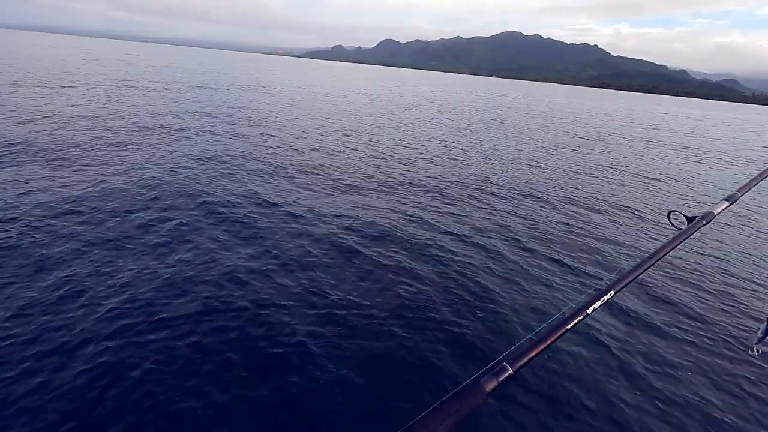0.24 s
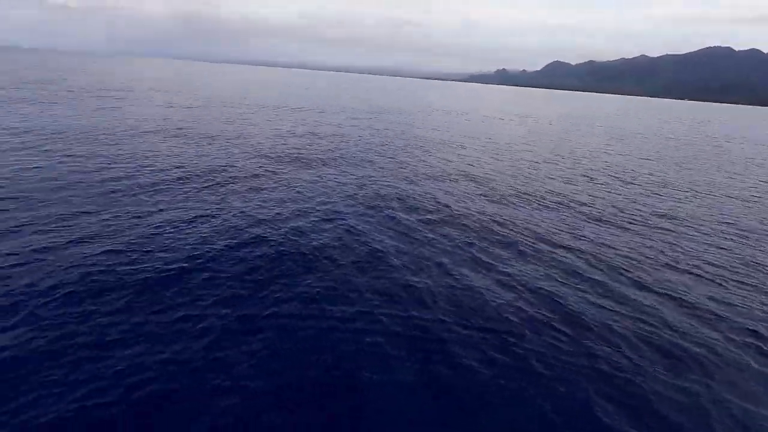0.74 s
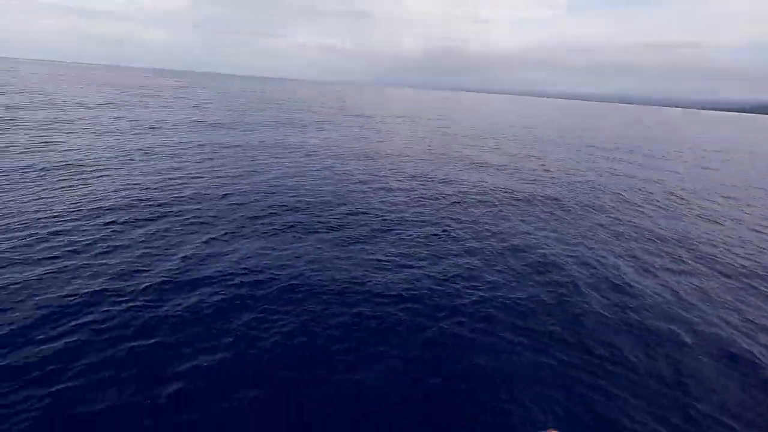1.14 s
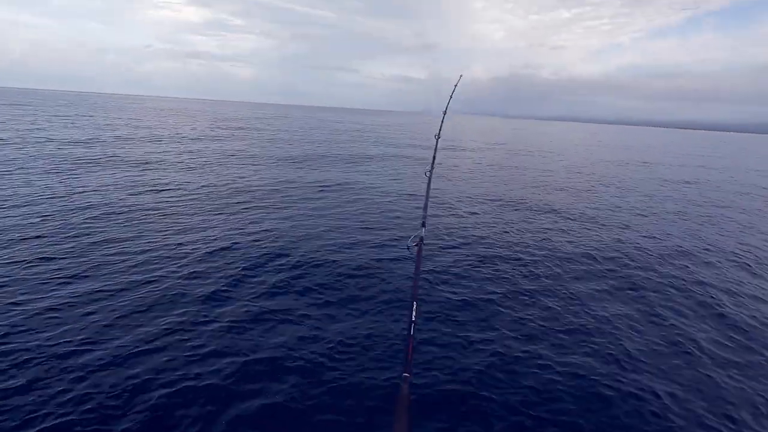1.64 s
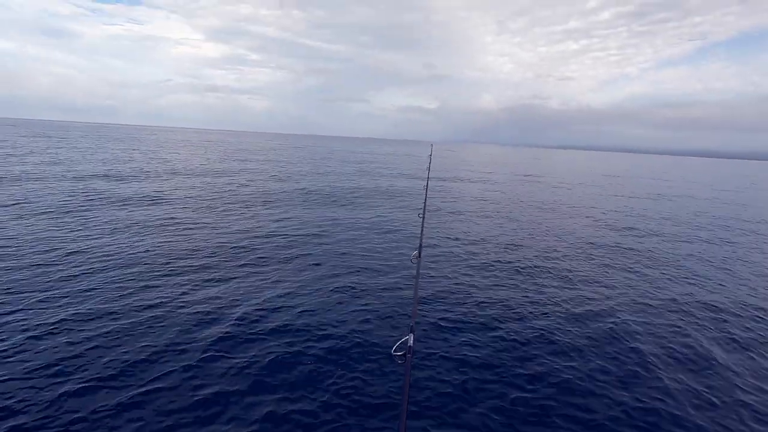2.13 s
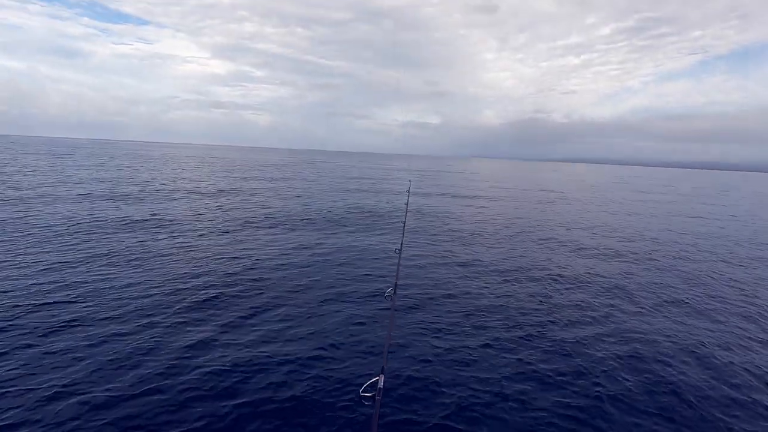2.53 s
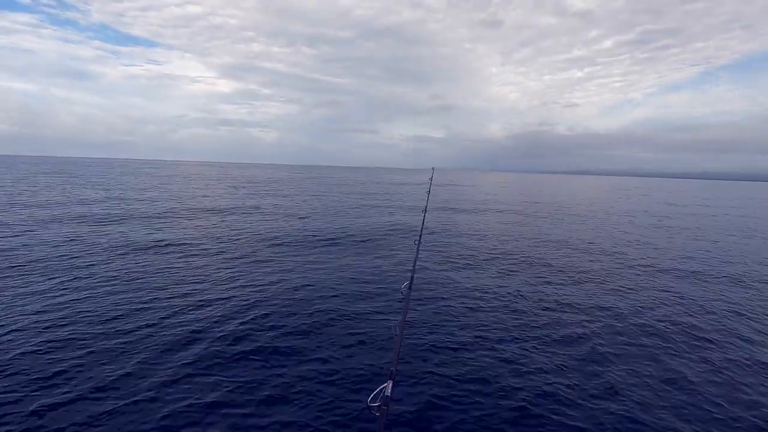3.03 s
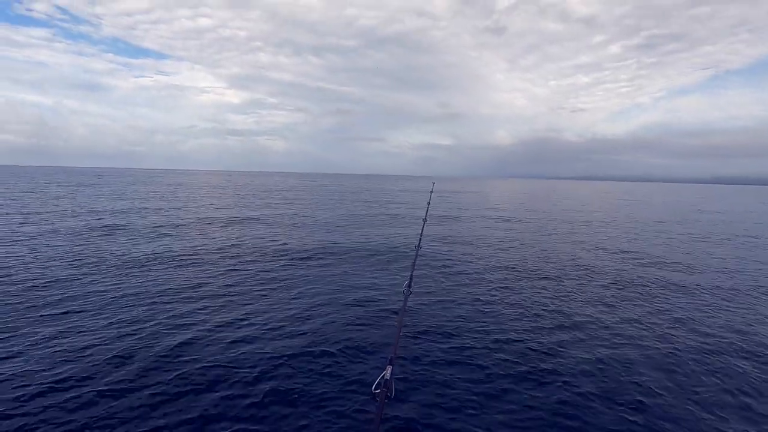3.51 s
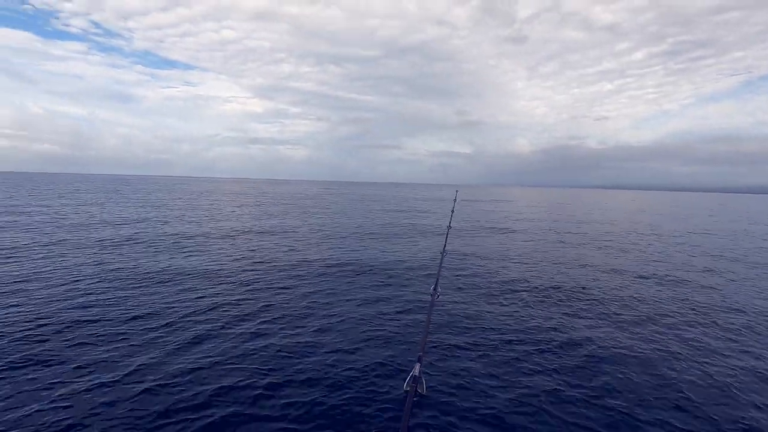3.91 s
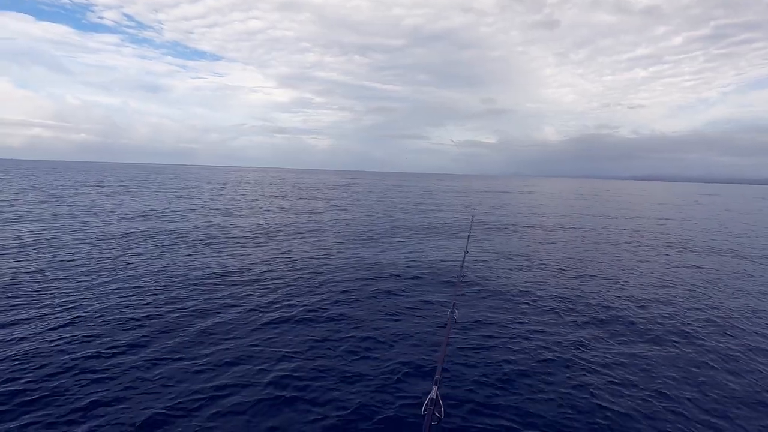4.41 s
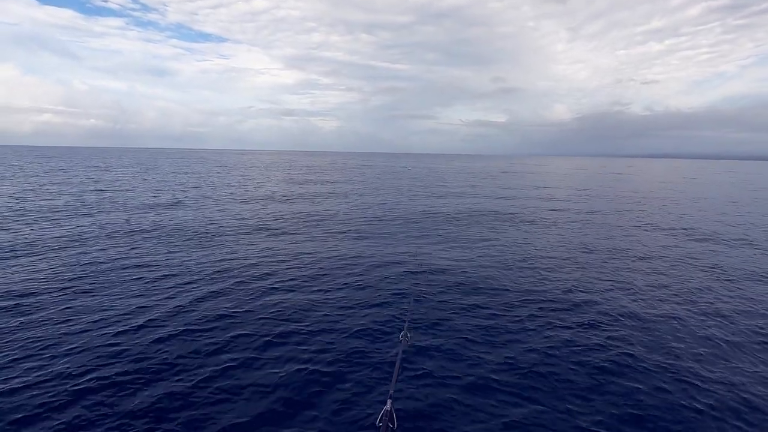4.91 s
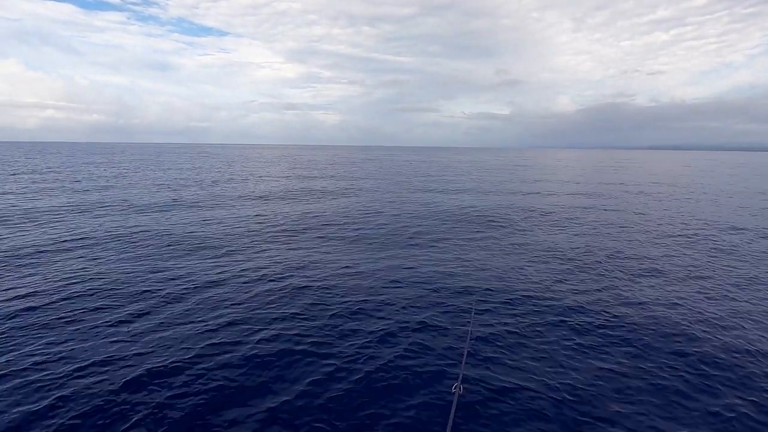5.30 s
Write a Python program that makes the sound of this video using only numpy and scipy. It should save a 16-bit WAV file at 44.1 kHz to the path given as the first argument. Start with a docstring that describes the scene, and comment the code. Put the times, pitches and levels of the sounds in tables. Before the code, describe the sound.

A fishing rod is cast close to the microphone, with a rising whoosh and a sharp crack. Line spins off the spool in a fast, fluttering hiss, ringing against the rod guides and gradually dropping in pitch and level. A loud clack of the reel's bail cuts it off, and slack line slides softly. Throughout, water laps and gurgles against a small boat, with a few hollow knocks and wind rumbling on the microphone.

```python
"""Fishing line on a long cast from a small boat: it whirls off the spool and rubs the guides, a high
hiss that sinks as the lure slows, while each coil whips the rod and rings a guide. Before the run a
sleeve rustles, the rod swishes and the line cracks against it; the bail ends the run with a sharp clack.
Wavelets slap and wash the hull, the boat knocks, wind buffets the microphone."""
import sys
import numpy as np
from scipy import signal
from scipy.fft import rfft, irfft, next_fast_len
from scipy.io import wavfile
from scipy.ndimage import uniform_filter1d, map_coordinates

SR = 44100
rng = np.random.default_rng(int(sys.argv[2]) if len(sys.argv) > 2 else 0)


def transcribe(u):
    """Save the signal u as a 16-bit wav file named by the first command-line argument.

    u: samples, shape (n,) or (channels, n), limited to [-1, 1]; the rate is SR.
    q: integer samples, one column per channel.
    """
    v = np.clip(np.atleast_2d(u).T, -1, 1)
    q = np.round(v * 32767).astype(np.int16)
    wavfile.write(sys.argv[1], SR, q)


N = 244755
TIME_S = np.arange(N) / SR
RUN_S, STOP_S = 1.681, 4.608  # line runs freely

# coils leaving the spool: t/s, rate/Hz
COIL_RATE = [(1.65, 165), (1.8, 150.6), (2.0, 134), (2.2, 121.5), (2.4, 109.6), (3.0, 83.7), (3.6, 68),
             (4.15, 56), (4.6, 55.6)]
# hiss shape: f/centre, level/dB
HISS_SHAPE = [(.1, -21), (.3, -8), (.55, -4), (.75, -0.5), (.98, 5), (1.17, 2.6), (1.4, -7.5), (1.7, -17.5),
              (2.2, -26), (2.8, -36)]
# hiss balance: f/Hz, L-R/dB
HISS_PAN = [(1000, 10), (3400, 4), (5000, -6), (7000, -6), (12000, -6)]
# line loops brushing a guide: t/s, level/dB, half-width/s
GUIDE_BRUSHES = [(1.697, -34, 0.017), (1.8, -37.5, 0.034), (1.912, -37, 0.041), (2.041, -40.5, 0.025),
                 (2.19, -45, 0.032), (2.335, -43, 0.012), (2.376, -42.5, 0.02), (2.517, -51, 0.043),
                 (2.583, -53.5, 0.029), (2.705, -47.5, 0.037), (2.921, -49, 0.024), (3.381, -52.5, 0.0068),
                 (3.526, -58, 0.0046), (3.584, -49.5, 0.0043), (3.728, -51, 0.0059), (3.945, -48.5, 0.029),
                 (4.131, -45, 0.0042), (4.248, -51.5, .018), (4.318, -49.5, 0.016), (4.393, -45.5, 0.033),
                 (4.538, -48, 0.046)]
# wide loops flapping past: t/s, level/dB
LOOP_FLAPS = [(1.716, -30), (1.859, -30.5), (1.899, -34.5), (2.052, -45), (2.16, -37), (2.28, -41.5)]
# blows: t/s, level/dB, rise/s per 9 dB, t60/s, tilt/(dB/octave)
ROD_BLOWS = [(1.578, -22.5, 0.0033, 0.027, 6), (1.5873, -12, 0.00086, 0.0094, 3.5),
             (1.5994, -14.5, 0.0052, 0.05, 0.5), (1.614, -32.5, .003, 0.15, 5.5),
             (3.885, -37, 0.0039, 0.031, 7), (3.906, -36, .001, 0.019, 0.5),
             (3.985, -42, 0.00073, 0.017, -6.5), (4.093, -37, 0.00089, .015, 3),
             (4.394, -34, .001, .012, 2.5), (4.535, -40, 0.00088, 0.014, -1)]
BAIL_BLOWS = [(4.6107, -23.5, 0.00023, 0.02, -0.5), (4.619, -21, .0005, .016, 2),
              (4.63, -4, 0.0015, 0.0072, 0), (4.635, -22.5, .0023, .17, -1.5),
              (4.659, -25, 0.0016, 0.028, -3), (4.6865, -18, 0.0013, 0.027, 0),
              (4.704, -31, 0.0023, 0.044, -8)]
# struck tones: t/s, level/dB, f/Hz, t60/s
METAL_RINGS = [(1.5727, -20.5, 3480, 0.046), (4.63, -36, 1180, .35), (4.63, -40, 507, 0.29),
               (4.704, -54, 5570, 0.35)]
BOAT_KNOCKS = [(1.836, -28.5, 500, 0.098), (1.891, -21.5, 432, 0.046), (2.1121, -18.5, 805, 0.009),
               (2.163, -21.5, 116.5, 0.11), (4.694, -32, 361, 0.15)]
# line and hand scuffing the rod: t/s, level/dB, t60/s
ROD_SCUFFS = [(0.149, -67, 0.084), (.606, -60, 0.07), (.624, -65.5, 0.1), (1.183, -62, 0.14),
              (1.365, -68, 0.1), (4.774, -55.5, 0.35), (4.825, -59, 0.07), (4.961, -52.5, 0.014)]
# light tackle knocks: t/s, level/dB, f/Hz
TACKLE_TICKS = [(.204, -65, 4130), (.51, -69, 4500), (1.865, -29.5, 1220), (4.767, -44, 2110),
                (4.817, -52, 3740), (4.849, -47, 4350), (4.997, -47.5, 4070), (4.999, -45, 1650),
                (5.072, -41.5, 3990), (5.077, -44.5, 2200), (5.075, -39, 1004)]
# wavelets: t/s, level/dB, bubble f/Hz, spray trim/dB, spray f/Hz, rise/s, air pocket trim/dB
HULL_SLAPS = [(0.222, -50.5, 1246, -12, 1800, .0005, 4), (.262, -47.5, 665, -30, 1800, .005, 4),
              (.342, -39.5, 1250, -12, 2600, 0.0044, -6), (.356, -31, 824, -3, 1820, .001, -20),
              (.367, -33, 602, 3.5, 1770, 0.0056, -1.5), (.402, -34, 741, -1, 2200, 0.006, -5),
              (.437, -35.5, 1000, -1, 2080, .0004, -21), (.702, -43.5, 860, -22, 2000, 0.0008, -4),
              (1.105, -55.5, 1280, -9, 3500, 0.0032, 6), (2.113, -35.5, 1230, -6, 1980, .0006, 2),
              (2.162, -36.5, 232.8, -30, 2000, .003, -0.5), (2.609, -39, 400, -17, 1800, 0.0021, -4),
              (3.086, -43.5, 1170, -30.5, 2000, 0.0029, 4), (3.244, -31, 1190, -2.5, 2380, 0.0018, 0.5),
              (3.278, -34, 666, -4, 2010, 0.0035, 1), (3.315, -38, 376, -25, 2000, 0.0047, -14),
              (3.35, -31, 945, -4, 3540, 0.0015, -16), (3.392, -39, 590, 6.5, 3000, .003, -15),
              (3.49, -47.5, 1280, -22, 2000, .002, 6), (3.497, -45.5, 605, -19, 2000, 0.0027, 5),
              (4.695, -35, 368, -6, 1800, 0.0027, -7), (4.763, -33.5, 1027, 5.5, 2080, 0.0095, -4),
              (4.815, -36, 1067, -6, 3000, 0.0065, -12), (5.37, -37.5, 870, -2.5, 2200, 0.0086, -6),
              (5.418, -49.5, 1400, 7.5, 2400, 0.0032, -3), (5.444, -36.5, 1027, -25, 2500, .002, -2)]
# swells along the hull: t/s, level/dB, fall/(dB/s) (sign ignored)
HULL_SURGES = [(0.268, -45.5, 36), (0.414, -42, 73), (.73, -53.5, 42), (2.39, -47.5, 41), (2.61, -50.5, -4),
               (2.999, -59, 55.5), (3.286, -33, 77), (3.376, -34, 109), (3.99, -50.5, 52), (4.714, -38, 42),
               (5.39, -45, 46)]
# wind strength: t/s, level/dB
WIND_LEVEL = [(0.0, -60), (0.36, -59), (1.17, -62.5), (1.27, -42.5), (1.39, -44), (1.58, -42.5),
              (1.79, -32.5), (1.97, -38.5), (2.06, -45.5), (2.32, -36.5), (2.57, -40.5), (2.66, -35.5),
              (2.92, -38.5), (3.15, -30), (3.43, -40.5), (4.28, -47), (4.54, -39.5), (4.62, -44),
              (4.93, -34), (5.12, -38), (5.33, -35.5), (5.55, -55)]
# eddies on the microphone: t/s, flutter/dB, buffet/dB
EDDIES = [(1.6, -38, -48), (1.9, -32, -40), (2.17, -43, -42), (2.621, -52, -28.5), (2.765, -36.5, -28.5),
          (3.07, -36, -33), (3.15, -31, -34), (3.3, -38, -45.5), (4.328, -58, -34), (4.73, -43, -51),
          (4.858, -33.5, -40), (5.03, -42, -47), (5.24, -40.5, -34)]

# resonances: f/Hz, width/Hz, level/dB
RATTLE_MODES = [(1280, 460, -0.5), (2200, 850, -1.5), (3000, 5300, -6.5), (4650, 710, -2.5)]
SPOOL_MODES = [(10690, 70, 0), (12030, 120, -7), (13330, 100, -10)]
GUIDE_MODES = [(4800, 210, 7), (8500, 270, -1), (10300, 300, -31)]
ROD_MODES = [(342, 87, -8), (506, 35, -3.5), (700, 190, -6), (1153, 74, 9), (1360, 290, 6),
             (1920, 730, 5.5), (2970, 630, 5.5), (3630, 350, -1), (4390, 190, 1.5), (5000, 210, -4.5),
             (5720, 440, -5.5), (7070, 1140, -12), (8800, 1100, -18), (12360, 2200, -19.5)]
BAIL_MODES = [(1170, 150, -5), (1410, 180, -6), (1975, 260, -1.5), (2760, 260, -9.5), (3250, 170, -4.5),
              (4440, 235, 1), (4910, 260, 0), (5500, 240, -14), (5780, 340, -8.5), (6500, 320, -11),
              (7050, 320, -16), (8900, 550, -17), (10500, 1200, -22), (12400, 1300, -25.5)]
HULL_MODES = [(590, 86, 1.5), (1230, 110, -0.5)]
# noise spectra: f/Hz, density/dB
SLIDE_SPECTRUM = [(700, -14.5), (1250, 6), (2200, 3), (3900, -2.5), (5400, -3), (7000, -9), (9500, -17),
                  (14000, -31.5)]
SWISH_SPECTRUM = [(60, -15), (170, 1), (500, -4.5), (1300, -9.5), (2500, -13.5), (4500, -21.5), (8000, -34),
                  (15000, -55)]
SLEEVE_SPECTRUM = [(400, -4), (900, 3), (1550, 3), (1800, -2), (2100, -2.5), (2600, -12), (3000, -28),
                   (6000, -41)]
WASH_SPECTRUM = [(80, -9.5), (135, 8.5), (200, 6), (420, -3), (750, -14.5), (1300, -10.5), (2200, -25.5),
                 (5000, -46.5), (14000, -51.5)]
SEA_SPECTRUM = [(60, -21.5), (125, 4), (200, 12.5), (450, -0.5), (900, -13), (1300, -8.5), (1900, -26),
                (3000, -30), (8000, -36), (15000, -68)]
BUFFET_SPECTRUM = [(8, -12.5), (25, 2.5), (55, 1), (95, -4), (150, -21.5), (400, -63.5), (1000, -95.5)]
FLUTTER_SPECTRUM = [(60, -12), (120, 0.5), (180, 0.5), (280, -17.5), (500, -26), (1500, -70)]
# left-right likeness: f/Hz, coherence
SCENE_COHERENCE = [(100, 1), (300, 0.9), (4000, 0.75), (8000, 0.81), (13000, 0.22)]
WIND_COHERENCE = [(30, 0.089), (70, 0.054), (130, 0.63), (300, 0.22)]
# microphone treble: f/Hz, gain/dB
MIC_TREBLE = [(11000, 0), (13000, -3), (14500, -7), (15800, -4)]
# balance of blows: f/Hz, L-R/dB
BLOW_PAN = [(1500, 1.5), (3000, 4.0), (5000, -4.5), (10000, -7.5)]


def line_hiss(turns):
    """Line rubs the guides: a ragged band, pulsing per coil, sinking and fading with speed."""
    hz, frame_s, spectra = signal.stft(noise(), SR, nperseg=512)
    centre_hz = np.maximum(82 * np.interp(frame_s, *np.transpose(COIL_RATE)), 5950)
    centre_hz *= 1 + .025 * np.interp(frame_s, TIME_S, wobble(50))
    patches = uniform_filter1d(rng.standard_normal(spectra.shape[1:]), size=6, axis=0)
    patches_db = 1.8 * unit(uniform_filter1d(patches, size=4, axis=1))
    gain = amp(along(HISS_SHAPE, hz[:, None] / centre_hz) + patches_db)
    gain /= np.sqrt(np.mean(gain ** 2, axis=0))
    hiss = signal.istft(spectra * gain, SR, nperseg=512)[1][:, :N]
    pulsing = unit(amp(1.6 * np.cos(2 * np.pi * turns) + 2 * wobble(300) + .6 * wobble(45)))
    hiss = filtered(hiss * pulsing, lambda f: pan(along(HISS_PAN, f)))
    speed_db = 6.5 * np.log2(curve(COIL_RATE) / 100)
    dip_db = -3 * bump(3.1, width_s=.043)
    return hiss * amp(-45.5 + speed_db + dip_db) * running()


def line_sizzle(turns):
    """Fast line sizzles in the guides at a fixed pitch, then fades."""
    force = amp(1.2 * np.cos(2 * np.pi * turns) + 2.5 * wobble(300))
    band = unit(rubbed(force, hz=12600, width_hz=2100))
    return band * amp(-52) * swell(RUN_S, 422, 27, hold_to_s=2.13) * running() * pan(-11)


def line_rattle(turns):
    """Coils whip the rod and ring a guide: hard after release, again as the line goes loose."""
    wild = amp(-44.5) * swell(RUN_S, 0, 13.5)
    loose = amp(-50.5) * swell(3.984, 33, 0)
    rattle = np.hypot(wild, loose)
    first_lash = amp(-39.5) * swell(1.73, 189, 125)
    uneven_turns = turns + .05 * wobble(60)
    whip = coil_blows(uneven_turns, scatter_db=1.2) * amp(.99 * wobble(300))
    rod = rubbed_body(whip, RATTLE_MODES) * pan(1.4)
    return rod * np.hypot(rattle, first_lash) * running() + guide_ring(uneven_turns, rattle)


def guide_ring(turns, rattle, hz=3381):
    """One guide mode, struck and scraped by coils and brushing loops."""
    brushes = sum(amp(db) * bump(s, width_s) for s, db, width_s in GUIDE_BRUSHES)
    force = np.hypot(rattle * amp(-2), brushes) * coil_blows(turns, scatter_db=2.2) * running()
    struck = unit(force * np.sin(2 * np.pi * hz * TIME_S + 1.3 * wobble(600)))
    scraped = unit(rubbed(force, hz, width_hz=270))
    return unit(struck + scraped) * np.sqrt(np.mean(force ** 2))


def spool_whistle():
    """Thin, flickering spool modes grow late in the run."""
    modes = rubbed_body(1, SPOOL_MODES)
    return modes * amp(-71.5 + 3.5 * wobble(25)) * swell(4, 14, 0) * running()


def line_whirl(turns):
    """The spinning loop hums at the coil rate while fast; the first loop is loudest."""
    hum = np.sqrt(2) * (np.sin(2 * np.pi * turns) + amp(-17) * np.sin(4 * np.pi * turns))
    first_loop = amp(-26) * swell(1.823, 174, 392)
    steady = amp(-42.5) * swell(1.823, 210, 124, hold_to_s=2.386)
    return hum * np.hypot(first_loop, steady) * amp(1.2 * wobble(8))


def slack_line(full_s=5.163, end_s=5.32):
    """Slack line slides over the guides and briefly rings them."""
    ring = unit(filtered(noise(), lambda f: resonances(GUIDE_MODES, f)))
    ring *= amp(-67) * swell(full_s, 302, 243, hold_to_s=end_s)
    slide = rush(SLIDE_SPECTRUM) * amp(-60) * swell(full_s, 75, 16, hold_to_s=end_s)
    crackle = unit(amp(4 * wobble(900)))
    return (slide * crackle + ring) * amp(1.9 * wobble(120))


def swish(start_s=1.305, peak_s=1.601):
    """The accelerating rod tears the air; line rushes after it in flapping loops."""
    speed = curve([(start_s, 0), (peak_s, 1)])
    rod = amp(-30.5) * speed ** 3.7 * swell(peak_s, 0, 90)
    line = amp(-37) * swell(1.7, 152, 30, hold_to_s=1.995)
    flaps = [amp(db) * swell(s, 900, 229) for s, db in LOOP_FLAPS]
    turbulence = unit(amp(1.9 * wobble(220)))
    return rush(SWISH_SPECTRUM) * turbulence * np.linalg.norm([rod, line, *flaps], axis=0)


def clacks():
    """Line strikes the rod, the bail snaps shut and rebounds; hard blows leave metal ringing."""
    rod = blows(ROD_BLOWS, ROD_MODES, contact_db=2, scrape_db=-3)
    bail = blows(BAIL_BLOWS, BAIL_MODES, contact_db=13.7, scrape_db=-7.5)
    return rod + bail + struck_tones(METAL_RINGS) * pan(-2.5)


def tackle_ticks(tick_t60_s=.078):
    """Light contacts: scuffs only scrape, ticks also ring."""
    out, t = np.zeros(N), np.arange(SR // 6) / SR
    attack = 1 - np.exp(-t / .00019)

    def band(hz, width_hz):
        return unit(bandpass(rng.standard_normal(len(t)), hz, width_hz))

    for s, db, t60_s in ROD_SCUFFS:
        add(out, s, band(4770, 4900) * amp(db - 60 * t / t60_s) * attack)
    for s, db, hz in TACKLE_TICKS:
        ring = band(hz, .23 * hz)
        scrape = amp(-13) * band(hz, 1.2 * hz)
        add(out, s, (ring + scrape) * amp(db - 60 * t / tick_t60_s) * attack)
    return out * pan(-1.5)


def sleeve_rustle(peak_s=.98):
    """Cloth rustles, swelling through the backswing."""
    envelope = swell(peak_s, 12, 203) * swell(.627, 198, 3, hold_to_s=peak_s)
    return rush(SLEEVE_SPECTRUM) * amp(-59.5 + 1.4 * wobble(89.3)) * envelope


def boat_knocks():
    """Short hollow knocks, one damped mode each."""
    return struck_tones(BOAT_KNOCKS)


def hull_slaps(splash_t60_s=.22, spray_t60_s=.11):
    """Wavelets hit the hull: hollow splash, spray, a ringing air pocket, a bubble cluster."""
    out, t = np.zeros(N), np.arange(SR // 4) / SR
    for s, db, hz, spray_db, spray_hz, rise_s, pocket_db in HULL_SLAPS:
        hollow = lambda f: resonances([(hz, .81 * hz, 0)], f) ** 3 * (1 + resonances(HULL_MODES, f))
        splash = unit(filtered(rng.standard_normal(len(t)), hollow))
        spikes = rng.standard_normal(len(t)) * amp(3 * rng.standard_normal(len(t)))
        spray = unit(bandpass(spikes, spray_hz, 1.14 * spray_hz, stages=4))
        hit = splash * amp(-6.5 - 60 * t / splash_t60_s)
        hit += spray * amp(spray_db - 8.5 - 60 * t / spray_t60_s)
        add(hit, 0, amp(pocket_db) * bubble(hz, decay_cycles=16, climb=.004))
        for late, pitch, size in rng.standard_normal((8, 3)):
            tone = bubble(hz * np.exp(.25 * pitch), decay_cycles=6, climb=.012)
            add(hit, .025 * abs(late), amp(-11 + 2.5 * size) * tone)
        add(out, s, amp(db) * hit * (1 - np.exp(-t / rise_s)))
    return out * pan(6.8)


def hull_wash(bubbles=900):
    """Water gurgles along the hull with each swell, over a steady sea murmur."""
    fizz = np.zeros(N)
    onsets_s = rng.uniform(0, N / SR, size=bubbles)
    for s, (pitch, size) in zip(onsets_s, np.clip(rng.standard_normal((bubbles, 2)), -2, 2)):
        tone = bubble(600 * np.exp(.4 * pitch), decay_cycles=5.3, climb=.03)
        add(fizz, s, amp(4 * size - 3 * pitch) * tone)
    water = rush(WASH_SPECTRUM) * amp(-2) + unit(fizz) * amp(-4.5)
    surges = np.linalg.norm([amp(db) * swell(s, 323, fall) for s, db, fall in HULL_SURGES], axis=0)
    return water * np.hypot(amp(-59.5), surges) + rush(SEA_SPECTRUM) * amp(-55)


def wind():
    """Wind buffets each microphone port differently; single eddies thump both."""
    strength = amp(curve(WIND_LEVEL))
    eddy_flutter, eddy_buffet = sum(amp([[flutter_db], [buffet_db]]) * swell(s, 497, 268)
                                    for s, flutter_db, buffet_db in EDDIES)
    buffet = rush(BUFFET_SPECTRUM, WIND_COHERENCE)
    buffet *= np.hypot(strength * amp(2.5 + .89 * wobble(20)), eddy_buffet)
    flutter = rush(FLUTTER_SPECTRUM, WIND_COHERENCE) * np.hypot(strength * amp(-15), eddy_flutter)
    return buffet * pan(4.3) + flutter


def coil_turns():
    """Wavering count of coils shed, near a whole number at the stop."""
    turns = np.cumsum(curve(COIL_RATE)) / SR
    return turns + 2 - turns[round(STOP_S * SR)] % 1 + .05 * wobble(25)


def coil_blows(turns, scatter_db, rub=.24, decay_s=.003):
    """Levelled force: one blow of random strength per turn, over a rub."""
    coil = turns.astype(int)
    since_s = (turns - coil) / curve(COIL_RATE)
    strength = amp(scatter_db * np.clip(rng.standard_normal(2000), -1.5, 1.5))[coil]
    force = strength * (rub + np.exp(-since_s / decay_s))
    return force / np.sqrt(uniform_filter1d(force ** 2, size=SR // 4))


def running():
    """1 while line leaves the spool."""
    return swell(RUN_S, 422, 893.5, hold_to_s=STOP_S)


def blows(rows, modes, contact_db, scrape_db):
    """Each blow, a scrape around one hard contact, rings modes of alternating sign."""
    out, t = np.zeros((2, N)), np.arange(-SR // 50, SR // 8) / SR
    body = lambda f: sum((-1) ** k * resonances([mode], f) for k, mode in enumerate(modes))
    body_rms = np.sqrt(np.mean(np.abs(body(np.linspace(0, SR / 2, 2000))) ** 2))
    contact = amp(contact_db) * (t == 0)
    grit = noise()
    for s, db, rise_s, t60_s, tilt_db in rows:
        envelope = amp(scrape_db - 9 * np.maximum(-t, 0) / rise_s - 60 * np.maximum(t, 0) / t60_s)
        scrape = grit[:, round(s * SR):][:, :len(t)] * envelope
        tilt = lambda f: amp(tilt_db * np.log2(np.clip(f, 800, 16000) / 3500))
        response = lambda f: body(f) / body_rms * tilt(f) * pan(along(BLOW_PAN, f))
        add(out, s + t[0], amp(db) * filtered(scrape + contact, response))
    return out


def struck_tones(rows):
    """Damped modes of slightly unsteady pitch."""
    out = np.zeros(N)
    for s, db, hz, t60_s in rows:
        t = np.maximum(TIME_S - s, 0)
        envelope = amp(db - 60 * t / t60_s) * (1 - np.exp(-t / .00013))
        out += envelope * np.sin(2 * np.pi * hz * t + .5 * wobble(200))
    return out


def bubble(hz, decay_cycles, climb):
    """Damped tone, climbing as the bubble nears the surface."""
    age = np.arange(int(5 * decay_cycles * SR / hz)) * hz / SR / decay_cycles
    phase = 2 * np.pi * decay_cycles * (age + climb * age * age / 2)
    return np.sin(phase) * np.exp(-age) * (1 - np.exp(-8 * age))


def rubbed(force, hz, width_hz):
    """One resonance driven by friction."""
    return bandpass(noise() * force, hz, width_hz)


def rubbed_body(force, modes):
    """Several friction-driven resonances, rms 1."""
    return unit(sum(amp(db) * rubbed(force, hz, width_hz) for hz, width_hz, db in modes))


def rush(spectrum, coherence=SCENE_COHERENCE):
    """Coloured stereo noise, rms 1."""
    return unit(filtered(noise(coherence), lambda f: amp(along(spectrum, f))))


def noise(coherence=SCENE_COHERENCE):
    """White stereo noise, rms 1."""
    angle = lambda f: np.arccos(np.clip(along(coherence, f), -1, 1)) / 2
    weights = lambda f: np.array([np.cos(angle(f)), np.sin(angle(f))])
    mid, side = filtered(rng.standard_normal((2, N)), weights)
    return unit(np.array([mid + side, mid - side]))


def resonances(modes, f):
    """Causal response of summed modes."""
    return sum(amp(db) * 1j * f * width / (hz * hz - f * f + 1j * f * width) for hz, width, db in modes)


def bandpass(x, hz, width_hz, stages=2):
    """Identical resonators in series."""
    return filtered(x, lambda f: resonances([(hz, width_hz, 0)], f) ** stages)


def filtered(x, response):
    """Zero-padded FFT filter."""
    n = x.shape[-1]
    padded = next_fast_len(n + SR // 10)
    return irfft(rfft(x, padded) * response(np.fft.rfftfreq(padded, 1 / SR)), padded)[..., :n]


def swell(full_s, rise_db_per_s, fall_db_per_s, hold_to_s=None):
    """Gain: rise to 1, optional hold, fall. Slope 0 is flat."""
    before_s = np.maximum(full_s - TIME_S, 0)
    after_s = np.maximum(TIME_S - (hold_to_s or full_s), 0)
    return amp(-rise_db_per_s * before_s - abs(fall_db_per_s) * after_s)


def bump(s, width_s):
    """Gaussian pulse, peak 1."""
    return np.exp(-((TIME_S - s) / width_s) ** 2)


def wobble(knots_per_s):
    """Smooth random curve."""
    knots = rng.standard_normal(int(N * knots_per_s / SR) + 4)
    return map_coordinates(knots, [TIME_S * knots_per_s])


def curve(points):
    """(t/s, value) points, read per sample."""
    return np.interp(TIME_S, *np.transpose(points))


def along(points, hz):
    """(f/Hz, value) points, read on a log axis."""
    f, values = np.transpose(points)
    return np.interp(np.log(hz + 1e-6), np.log(f), values)


def add(track, s, x):
    """Mix x in at time s."""
    part = track[..., max(round(s * SR), 0):][..., :x.shape[-1]]
    part += x[..., :part.shape[-1]]


def pan(db):
    """Stereo gains for L-R in dB."""
    return amp(np.array([[.5], [-.5]]) * db)


def amp(db):
    """dB to gain."""
    return 10 ** (np.asarray(db) / 20)


def unit(x):
    """Scale to rms 1."""
    return x / np.sqrt(np.mean(x ** 2) + 1e-20)


def scene():
    """Tackle close by, water below, wind on the microphone."""
    turns = coil_turns()
    line = line_hiss(turns) + line_sizzle(turns) + line_rattle(turns)
    line += spool_whistle() + line_whirl(turns) + slack_line()
    cast = line + sleeve_rustle() + swish() + clacks()
    return cast + boat_knocks() + tackle_ticks() + hull_slaps() + hull_wash() + wind()


def record(dry):
    """Microphone: right port leads, treble softens, peaks clip, band is limited."""
    lead_s, top_hz = 3.2e-5, 15800
    delay = lambda f: np.exp(1j * np.pi * f * lead_s * np.array([[-1], [1]]))
    ports = filtered(dry, lambda f: delay(f) * amp(along(MIC_TREBLE, f)))
    return filtered(np.clip(ports, -.9, .9), lambda f: np.clip((top_hz - f) / 300 + .5, 0, 1))


dry = scene()
out = record(dry)
transcribe(out)
```